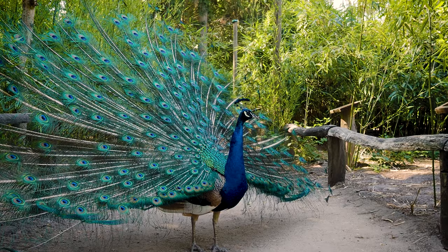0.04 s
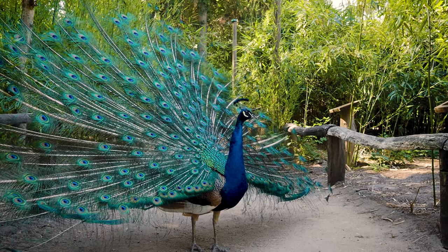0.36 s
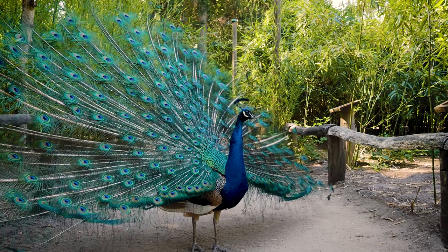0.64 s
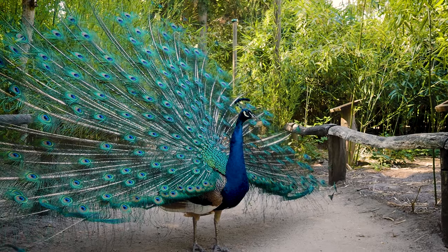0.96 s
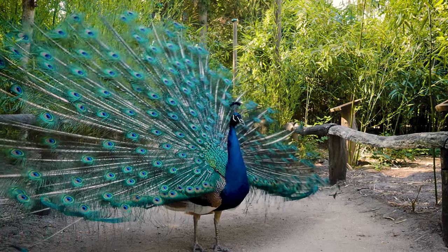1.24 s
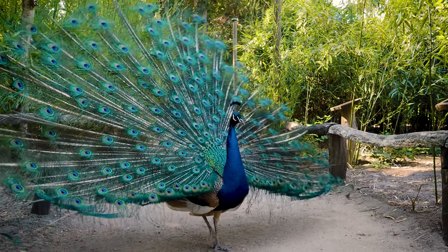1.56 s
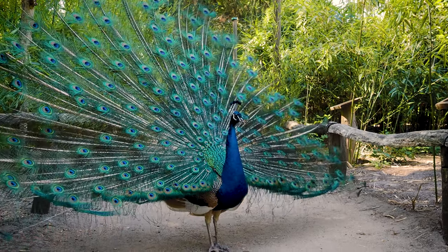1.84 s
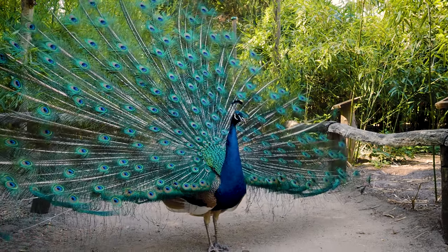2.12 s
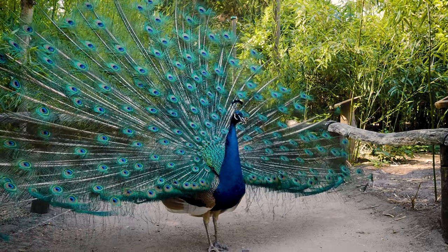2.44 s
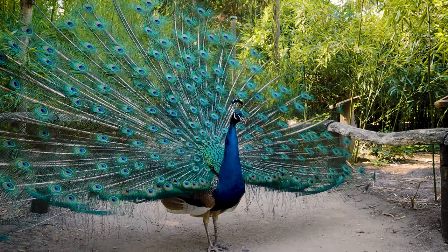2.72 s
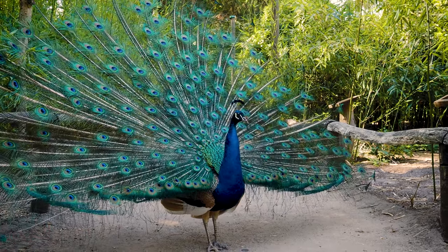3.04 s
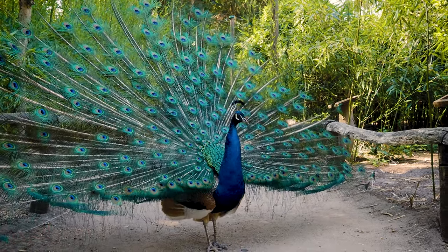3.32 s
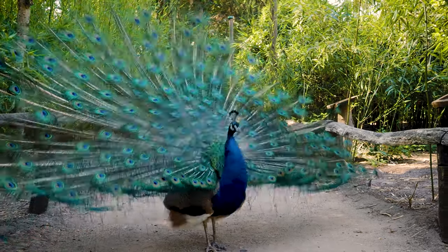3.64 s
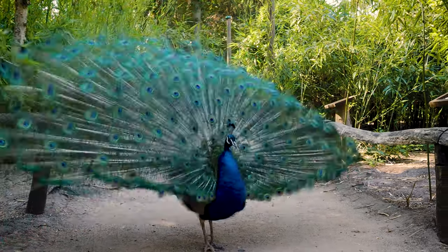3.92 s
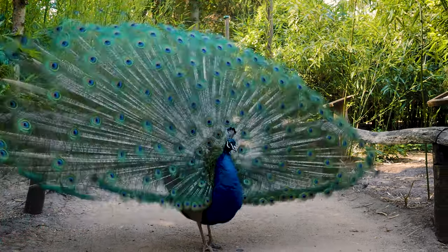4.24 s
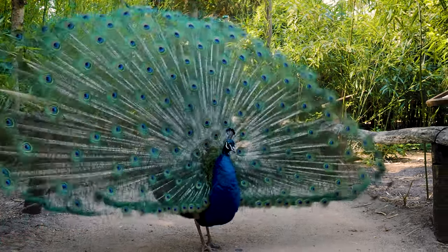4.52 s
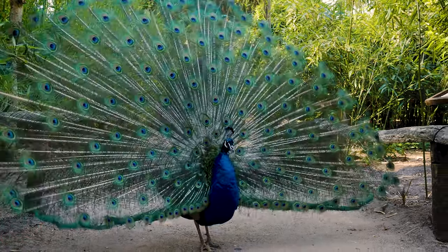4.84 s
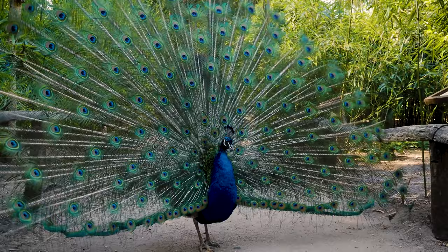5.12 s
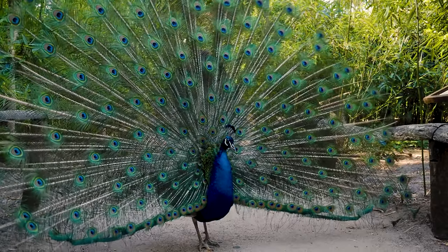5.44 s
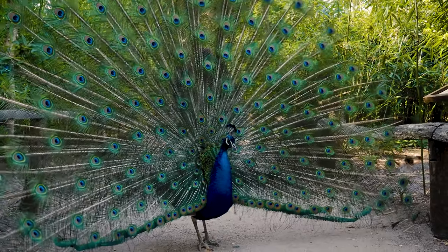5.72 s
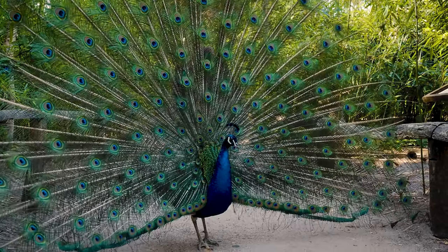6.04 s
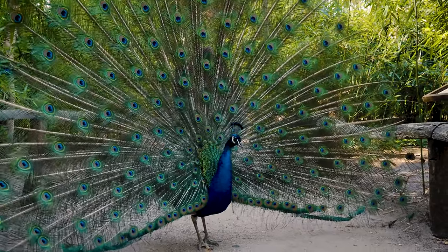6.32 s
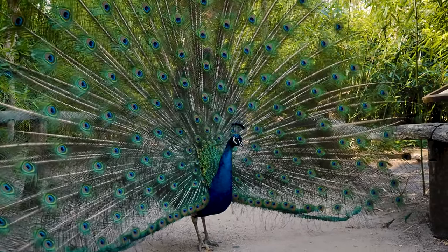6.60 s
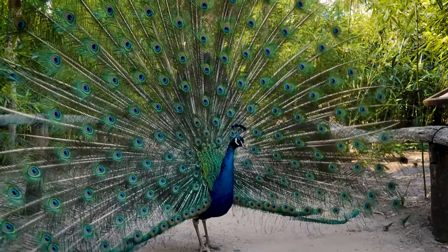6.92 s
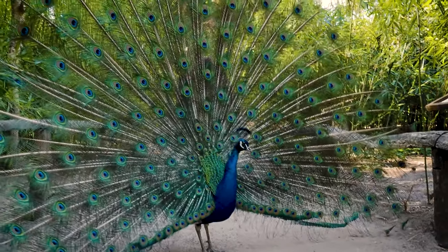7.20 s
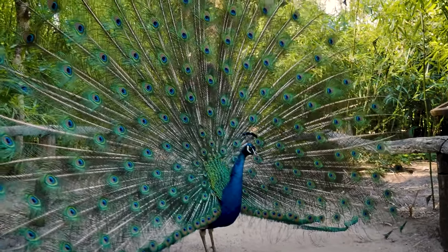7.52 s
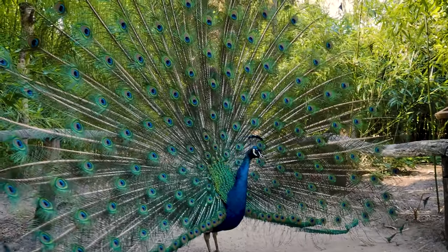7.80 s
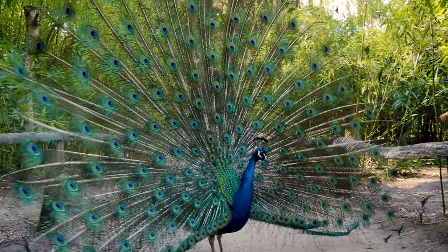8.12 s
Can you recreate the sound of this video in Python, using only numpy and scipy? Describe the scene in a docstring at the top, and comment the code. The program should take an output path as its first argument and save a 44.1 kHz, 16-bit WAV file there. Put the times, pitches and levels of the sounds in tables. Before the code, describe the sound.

Stiff feathers shiver in a rapid, pulsing swish with a few sharp ticks, while far birds whistle over steady outdoor background noise.

```python
"""Among echoing trees, a peacock close by shivers its train about 21 times a second.
Each swing presses the feathers together, so friction and impacts make a pulsing swish and rattle;
single quills tick as they catch and slip, and the train hisses softly as it turns and settles.
Far birds whistle, their tones prolonged by scattering from the trees. A distant motor hums
at harmonics of its shaft rate under a low rumble and a murmur of treetops."""
import sys
import numpy as np
from scipy import signal
from scipy.fft import rfft, irfft, next_fast_len
from scipy.io import wavfile
from scipy.ndimage import uniform_filter1d, map_coordinates

SR = 44100
rng = np.random.default_rng(int(sys.argv[2]) if len(sys.argv) > 2 else 0)


def materialize(psi):
    """Save the field psi as 16-bit PCM at rate SR to the path in sys.argv[1].

    A 1-D psi becomes a single channel; in a 2-D psi each row is a channel.
    """
    bounded = np.clip(np.atleast_2d(psi).T, -1, 1)
    quanta = np.round(bounded * 32767).astype(np.int16)
    wavfile.write(sys.argv[1], SR, quanta)


N = 359856

# background spectra: frequency_hz, relative_db
RUMBLE_SPECTRUM = [(5, -28.5), (17, -1), (35, 0), (60, -1.5), (100, -7), (160, -12), (250, -15.5),
                   (400, -23.5), (800, -42.5), (2000, -65.5)]
AIR_SPECTRUM = [(150, -13.5), (420, -3.5), (650, 2.5), (860, -3.5), (1020, 0.5), (1400, -4), (1900, -11),
                (2400, -8), (3000, -12.5), (4000, -22.5), (6000, -44), (15000, -69)]
TREETOP_SPECTRUM = [(100, -24), (280, -2), (600, -16), (1300, -12.5), (2600, -6), (4000, -15),
                    (8000, -56)]
# motor harmonics: multiple_of_shaft_rate, level_db
MOTOR_HARMONICS = [(1, -40.5), (2, -39), (3, -52), (5, -44), (6, -56), (8, -64), (9, -61.5), (12, -63),
                   (17, -76), (19, -64.5)]
# reverberation time of the grove: frequency_hz, t60_s
GROVE_DECAY = [(500, 3.1), (2500, 1.28), (7000, 0.71), (14000, 0.11)]
# slurred whistles: start_s, length_s, from_hz, to_hz, bend_exponent, level_db, direct_path_db
BIRD_WHISTLES = [(0.231, 0.083, 1786, 1590, 1.7, -55, -4), (.386, 0.084, 2127, 1885, 1.5, -52, -1),
                 (.45, 0.2, 1150, 1158, 1, -58, -12), (0.811, 0.1, 2260, 2734, 1.26, -51, 2.5),
                 (.886, 0.11, 2704, 3460, 1.03, -50.5, 6.5), (1.267, 0.17, 2250, 2740, 2.8, -51.5, 1),
                 (1.644, .15, 2153, 2545, 3.2, -48.5, -1), (5.322, 0.047, 2040, 2125, 1.9, -47.5, -4),
                 (5.414, 0.093, 1800, 1580, 1.23, -56, 5), (5.587, 0.056, 2950, 2600, 1, -44, -6),
                 (5.891, 0.13, 2340, 2074, 2.68, -46.5, -10), (7.819, .037, 4190, 3060, 0.76, -58, 11),
                 (7.891, .04, 3590, 4030, 1, -63, 12), (7.909, .042, 2160, 2314, 1.4, -59, 4)]
# trills around one pitch: start_s, length_s, pitch_hz, level_db, pan_left_db
BIRD_TRILLS = [(0.222, 0.052, 2495, -53, 4), (4.921, 0.31, 2036, -51.5, 0), (5.634, 0.19, 2720, -41, 1.5)]
# thin peeps of a tiny bird: start_s, from_hz, to_hz, level_db
BIRD_PEEPS = [(1.588, 7150, 6720, -54), (1.77, 6750, 6680, -62), (1.956, 6700, 6740, -66),
              (2.4, 8300, 8220, -72), (2.825, 7800, 7150, -71), (3.08, 7700, 8100, -67.5),
              (7.39, 7600, 8250, -69)]
# bouts of far twitter: centre_s, level_db, half_width_s
TWITTER_BOUTS = [(2.15, -68, 0.15), (5.7, -70, 0.22), (7, -68, 0.48)]
# spectrum of the twitter: frequency_hz, relative_db
TWITTER_SPECTRUM = [(5500, -43), (6900, -10), (7200, 0.5), (7550, -4), (8200, -15), (9500, -45)]
# quills that catch and slip past each other: start_s, level_db, length_s
QUILL_SLIPS = [(1.704, -54.5, .045), (3.8755, -25.5, 0.014), (3.964, -34, .04), (4.023, -28, .0035),
               (4.122, -35.5, 0.037), (5.576, -52, 0.0034), (5.856, -57, 0.055), (6.413, -51, 0.009),
               (6.505, -46, .006), (6.994, -48, .004), (7.574, -51, 0.0053)]
# a stiff shaft cracks: start_s, level_db, pitch_hz, t60_s
SHAFT_CRACKS = [(6.6952, -21.5, 3030, 0.0067)]
# soft swells of high hiss as the train brushes in a turn and settles after the shiver:
# centre_s, level_db, half_width_s
TRAIN_RUSTLES = [(2.24, -62, 0.079), (5.4, -64, 0.55)]
# spectra of the high hiss, vanes, shafts and slipping quills: frequency_hz, relative_db
HISS_SPECTRUM = [(2000, -7), (4500, 2), (6400, 2), (7300, 0.5), (8600, -1.5), (10100, 1), (11200, -5.5),
                 (13000, -1), (14000, -4.5), (15500, -0.5)]
VANE_SPECTRUM = [(600, -26), (1800, -8), (2800, -0.5), (3800, -6.5), (5600, 0.5), (6500, -1.5),
                 (7400, -0.5), (8500, -11), (9300, -10), (10200, -3), (11200, -10.5), (12500, -8.5),
                 (14200, -18), (15200, -12), (15900, -13.5)]
SHAFT_SPECTRUM = [(150, -25), (400, -14), (700, 1), (850, -4), (1000, 4.5), (1200, -5.5), (1450, 0.5),
                  (1750, -7.5), (2700, -3), (4500, -16.5), (9000, -48)]
SLIP_SPECTRUM = [(500, -1.5), (2500, -10.5), (6200, 2.5), (8600, -1), (10300, -1), (12600, -3.5),
                 (14100, -5), (15400, 3), (17000, -29)]
# stereo width of the fan of feathers: frequency_hz, side_db
FAN_SIDE_LEVELS = [(1500, -6), (3500, -3), (5300, -14), (7400, -4.5), (8800, 0), (10300, -7), (14100, 1),
                   (15200, -6)]
# a trial shiver, then the full one: start_s, hold_s, level_db
SHAKE_BOUTS = [(3.503, .03, -46.5), (3.76, 0.73, -41)]


def amp(db):
    """Amplitude ratio for a level in decibels."""
    return 10 ** (np.asarray(db) / 20)


def unit(x):
    """Normalisation to rms 1."""
    return x / np.sqrt(np.mean(x ** 2) + 1e-20)


def along(points, hz):
    """Interpolation of (frequency_hz, value) points on a logarithmic frequency axis."""
    frequencies, values = np.transpose(points)
    return np.interp(np.log(hz + 1), np.log(frequencies + 1), values)


def clock():
    """The time of every sample in seconds."""
    return np.arange(N) / SR


def wobble(rate_hz):
    """Smooth random modulation: a spline through rate_hz random knots a second."""
    knots = rng.standard_normal(int(N * rate_hz / SR) + 4)
    grid = np.arange(0, N, 64)
    return np.interp(np.arange(N), grid, map_coordinates(knots, [grid * rate_hz / SR]))


def swells(rows, base_db):
    """Incoherent addition: Gaussian swells sum in power over a steady floor, giving a gain."""
    t = clock()
    power = sum(amp(db) ** 2 * np.exp(-.5 * ((t - s) / half_s) ** 2) for s, db, half_s in rows)
    return np.sqrt(amp(base_db) ** 2 + power)


def add(track, start_s, sound):
    """Superposition of a sound on a track."""
    part = track[..., round(start_s * SR):][..., :sound.shape[-1]]
    part += sound[..., :part.shape[-1]]


def coloured(x, spectrum, size=4096):
    """Minimum-phase filtering to a spectrum, conserving the power of white noise."""
    gain = amp(along(spectrum, np.fft.rfftfreq(size, 1 / SR)))
    cepstrum = irfft(np.log(gain))
    cepstrum[1:size // 2] *= 2
    cepstrum[size // 2 + 1:] = 0
    pulse = irfft(np.exp(rfft(cepstrum)))
    return signal.fftconvolve(x, pulse[None] / np.linalg.norm(pulse), axes=1)[:, :N]


def panned(x, left_db):
    """Interaural level difference: the left gains left_db over the right."""
    return x * amp([[left_db / 2], [-left_db / 2]])


def spread(pair, side_db):
    """Mid-side stereo: the sum and difference of two unrelated signals give width."""
    mid, side = pair[0], pair[1] * amp(side_db)
    return np.array([mid + side, mid - side])


def widened(pair, width):
    """Mid-side stereo whose width depends on frequency."""
    side_gain = amp(along(width, np.fft.rfftfreq(N, 1 / SR)))
    side = irfft(rfft(pair[1]) * side_gain, N)
    return spread([pair[0], side], side_db=0)


def rush(spectrum, side_db):
    """Filtered stereo noise whose middle has rms 1."""
    return coloured(spread(rng.standard_normal((2, N)), side_db), spectrum)


def outdoors(sway_db=.55):
    """Broadband noise: a rumble that grows near the end, a far wash and a wide murmur of treetops."""
    rumble_db = np.interp(clock(), [6, 7.2], [-39, -37])
    rumble = amp(rumble_db + sway_db * wobble(2.495)) * rush(RUMBLE_SPECTRUM, side_db=-20)
    air = amp(-48 + sway_db * wobble(5)) * rush(AIR_SPECTRUM, side_db=-8)
    antiphase = amp(-57) * rng.standard_normal(N) * np.array([[1], [-1]])
    treetops = coloured(antiphase, TREETOP_SPECTRUM)
    return rumble + air + treetops


def motor(shaft_hz=27.87, drift=0.002966, flutter_db=-0.3, throb_depth=0.37):
    """Rotation gives a harmonic series; the upper harmonics throb once every four turns."""
    turns = np.cumsum(shaft_hz * (1 + drift * wobble(1.5))) / SR
    throb = 1 + throb_depth * np.sin(2 * np.pi * turns / 4)
    drone = np.zeros(N)
    for order, db in MOTOR_HARMONICS:
        harmonic = np.sqrt(2) * np.sin(2 * np.pi * (order * turns + rng.random()))
        gain = amp(db + flutter_db * wobble(2.1))
        drone += gain * (throb if order > 2 else 1) * harmonic
    return drone


def note(length_s, from_hz, to_hz, bend=1, warble=0, warble_hz=31, waver=0.0089):
    """Frequency modulation of a pure tone: it glides evenly at bend 1 and arrives early above 1."""
    progress = np.clip(np.arange(SR) / SR / length_s, 0, 1)
    trill_hz = warble_hz * (1 + .2 * wobble(20.4)[:SR])
    trill = np.sin(2 * np.pi * np.cumsum(trill_hz) / SR)
    glide_hz = to_hz + (from_hz - to_hz) * (1 - progress) ** bend
    pitch_hz = glide_hz * (1 + waver * wobble(159)[:SR] + warble * trill)
    envelope = np.abs(np.sin(np.pi * progress)) ** 0.31
    return np.sqrt(2) * envelope * np.sin(2 * np.pi * np.cumsum(pitch_hz) / SR)


def among_trees(x, direct_db, echo_db, trunks_db):
    """Multipath propagation: direct sound, early echoes from near trunks and the grove's long scatter."""
    hz, t, noise = signal.stft(rng.standard_normal((2, SR)), SR, nperseg=256)
    fade_db = trunks_db * np.exp(-t / 0.014) - 60 * t / along(GROVE_DECAY, hz)[:, None]
    tail = signal.istft(noise * amp(fade_db), SR, nperseg=256)[1]
    echo = signal.fftconvolve(x[None], tail / np.linalg.norm(tail[0]), axes=1)[:, :len(x)]
    direct = np.array([x, np.roll(x, 5)])  # from the side, so the right ear hears it later
    return amp(direct_db) * direct + amp(echo_db) * echo


def birds(peep_s=.065, flicker_db=3):
    """The ratio of direct to reverberant sound conveys distance; the farthest birds blur to a twitter."""
    song = np.zeros((2, N))
    for start_s, length_s, from_hz, to_hz, bend, db, direct_db in BIRD_WHISTLES:
        tone = note(length_s, from_hz, to_hz, bend)
        whistle = among_trees(tone, direct_db, echo_db=2.5, trunks_db=6.5)
        add(song, start_s, amp(db) * panned(whistle, left_db=0.2))
    for start_s, length_s, hz, db, left_db in BIRD_TRILLS:
        tone = note(length_s, hz, hz, warble=0.061, waver=0.014)
        trill = among_trees(tone, direct_db=-5, echo_db=2.5, trunks_db=9)
        add(song, start_s, amp(db) * panned(trill, left_db))
    for start_s, from_hz, to_hz, db in BIRD_PEEPS:
        tone = note(peep_s, from_hz, to_hz, bend=1.5)
        peep = among_trees(tone, direct_db=1.5, echo_db=2, trunks_db=5)
        add(song, start_s, amp(db) * panned(peep, left_db=2))
    twitter_gain = swells(TWITTER_BOUTS, base_db=-76.5) * amp(flicker_db * wobble(20))
    return song + twitter_gain * rush(TWITTER_SPECTRUM, side_db=1)


def scuffs(per_second, t60_s):
    """Friction noise: feathers brush at random moments, each touch a decaying burst; rms 1."""
    energy = (rng.random((2, N)) < per_second / SR) * rng.exponential(size=(2, N))
    decay = amp(-60 * np.arange(SR // 20) / SR / t60_s) ** 2
    power = np.abs(signal.fftconvolve(energy, decay[None], axes=1)[:, :N])
    return unit(np.sqrt(power) * rng.standard_normal((2, N)))


def slip(t, db, length_s, rise_share=0.24, fall_db=22):
    """A sudden release makes a noise burst with a linear rise and an exponential decay."""
    progress = t / length_s
    envelope = np.minimum(progress / rise_share, amp(-fall_db * (progress - rise_share)))
    return envelope * amp(db) * rng.standard_normal((2, len(t)))


def quills():
    """Stick-slip friction: caught quills let go in bright ticks; a shaft cracks with a damped ring."""
    slips, ring = np.zeros((2, N)), np.zeros(N)
    t = np.arange(SR // 10) / SR
    for start_s, db, length_s in QUILL_SLIPS:
        add(slips, start_s, slip(t, db, length_s))
    for start_s, db, hz, t60_s in SHAFT_CRACKS:
        add(slips, start_s, slip(t, db - 14, length_s=.003))
        add(ring, start_s, amp(db - 60 * t / t60_s) * np.sin(2 * np.pi * hz * t))
    ticks = coloured(spread(slips, side_db=-7), SLIP_SPECTRUM)
    idle = amp(-74) * scuffs(per_second=7.9, t60_s=0.043)  # the raised train never lies quite still
    return ticks + ring + coloured(spread(idle, side_db=-3), VANE_SPECTRUM)


def train_rustle():
    """Friction noise: a faint steady hiss swells as the train brushes in a turn and later settles."""
    gain = swells(TRAIN_RUSTLES, base_db=-62.5) * amp(0.56 * wobble(8))
    return gain * rush(HISS_SPECTRUM, side_db=1)


def effort(attack_s=0.14, release_s=0.44, settle_s=0.23, settle_db=-16):
    """Envelope of a driven vibration: each bout builds, holds and swings out; the feathers then settle."""
    t = clock()
    drive = np.zeros(N)
    for start_s, hold_s, db in SHAKE_BOUTS:
        rise = (t - start_s) / attack_s
        fall = 1 - (t - start_s - attack_s - hold_s) / release_s
        drive = np.maximum(drive, amp(db) * np.clip(np.minimum(rise, fall), 0, 1))
    step = 1 / (settle_s * SR)
    lingering = signal.lfilter([step], [1, step - 1], drive)
    return np.hypot(drive, amp(settle_db) * lingering)


def swings(first_s=3.574, slow_hz=19.7, fast_hz=21.5, count=32,
           half_width_s=0.01, jitter_s=0.0029, scatter_db=2):
    """Quasi-periodic contact pressure, rms about 1: each swing throws the feathers together."""
    t = clock()
    swing_hz = np.interp(t, [4.1, 4.18], [slow_hz, fast_hz])  # quickens as the fan comes upright
    cycles = np.cumsum(swing_hz) / SR
    beats_s = np.interp(np.arange(count), cycles - np.interp(first_s, t, cycles), t)
    pulses = [(s + jitter_s * late, scatter_db * hard, half_width_s)
              for s, (late, hard) in zip(beats_s, rng.standard_normal((count, 2)))]
    pressure = swells(pulses, base_db=-7)
    return pressure / np.sqrt(uniform_filter1d(pressure ** 2, size=SR // 5))


def contacts(per_second, scatter_db=0.5):
    """Shot noise: two random streams of tiny impacts of uneven size; rms 1."""
    hits = rng.random((2, N)) < per_second / SR
    return unit(hits * rng.standard_normal((2, N)) * amp(scatter_db * rng.standard_normal((2, N))))


def train_shiver(uneven_db=1.3):
    """Contact pressure modulates the amplitude of scraping barbs, rattling quills and knocking shafts."""
    drive = effort()
    pressure = swings() * amp(uneven_db * wobble(220))
    barbs = contacts(per_second=12000)
    rattle = amp(-6) * scuffs(per_second=600, t60_s=0.0078)
    swish = widened(barbs + rattle, FAN_SIDE_LEVELS) * pressure * drive
    knock_gain = amp(-45) * pressure ** 0.59 * (drive / drive.max()) ** 0.55
    clatter = spread(contacts(per_second=1800), side_db=-17) * knock_gain
    return coloured(swish, VANE_SPECTRUM) + coloured(clatter, SHAFT_SPECTRUM)


def scene():
    """Superposition of the near peacock and the far sources, all a little louder on the left."""
    peacock = panned(train_shiver() + quills(), left_db=-0.2)
    return panned(peacock + birds() + motor() + outdoors() + train_rustle(), left_db=0.92)


def record(dry, start_s=.068, cutoff_hz=15780):
    """Band limiting: after a moment of silence the sound passes through an ideal low-pass filter."""
    size = next_fast_len(N + SR // 2)
    spectrum = rfft(dry * (clock() > start_s), size)
    passband = np.fft.rfftfreq(size, 1 / SR) < cutoff_hz
    return irfft(spectrum * passband, size)[:, :N]


dry = scene()
out = record(dry)
materialize(out)
```